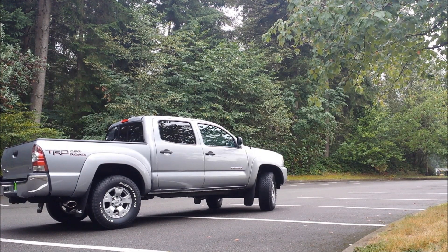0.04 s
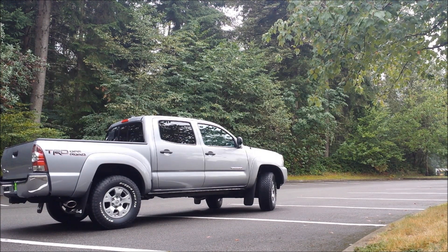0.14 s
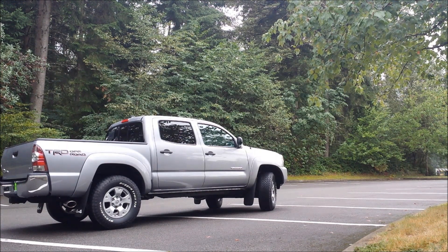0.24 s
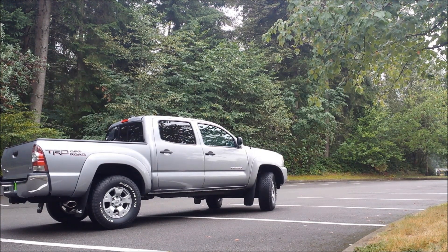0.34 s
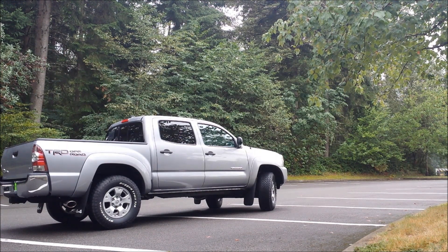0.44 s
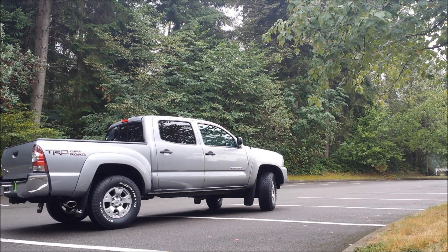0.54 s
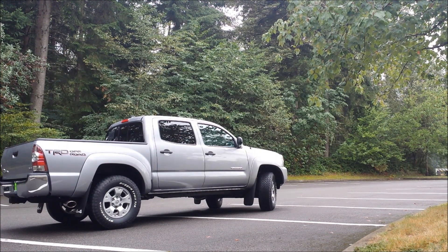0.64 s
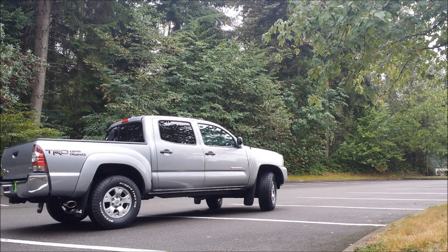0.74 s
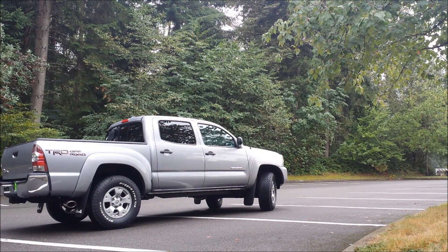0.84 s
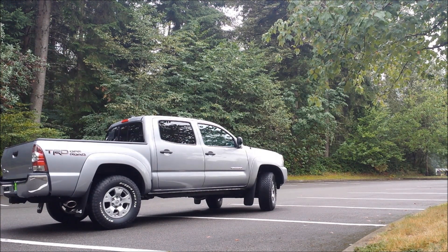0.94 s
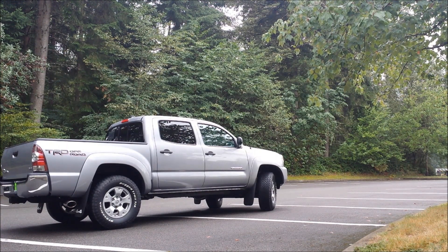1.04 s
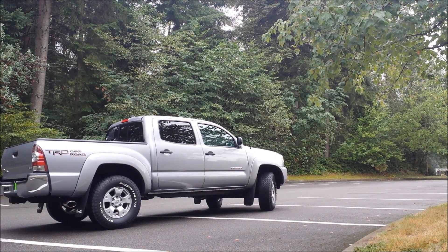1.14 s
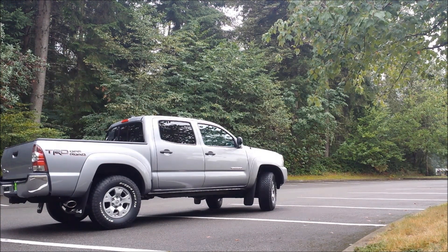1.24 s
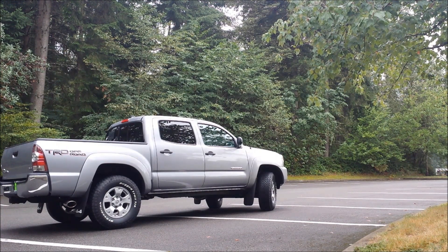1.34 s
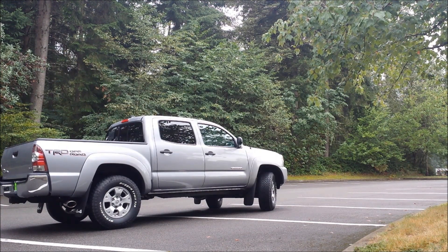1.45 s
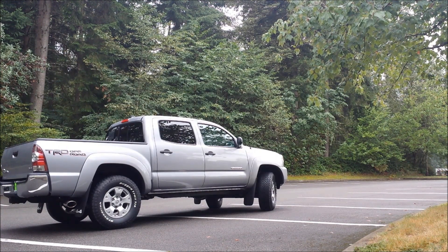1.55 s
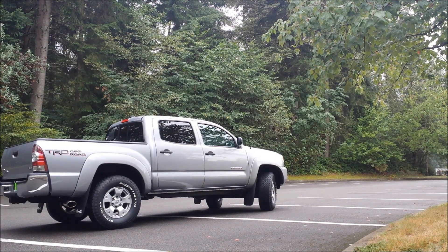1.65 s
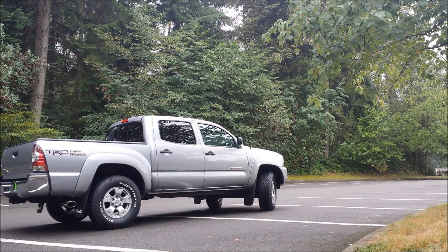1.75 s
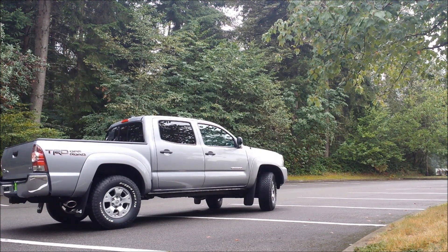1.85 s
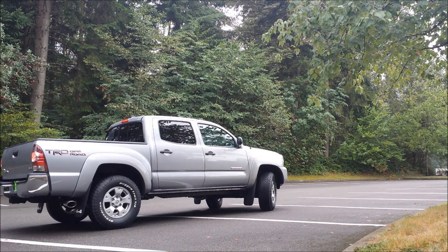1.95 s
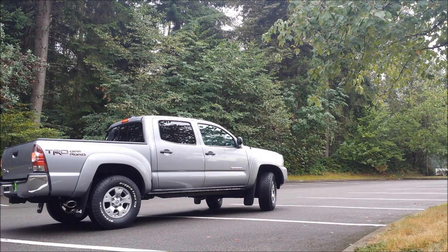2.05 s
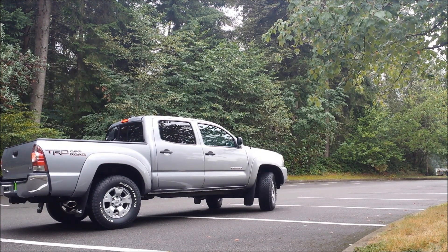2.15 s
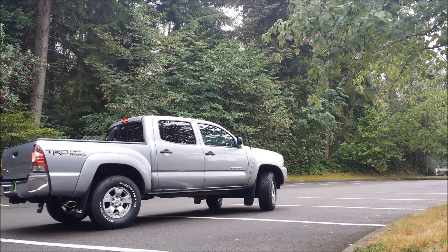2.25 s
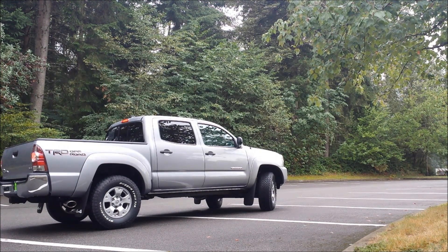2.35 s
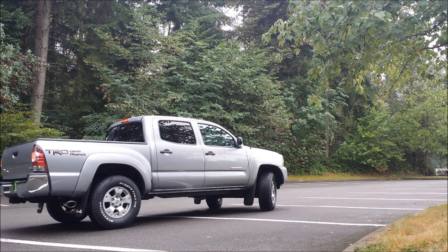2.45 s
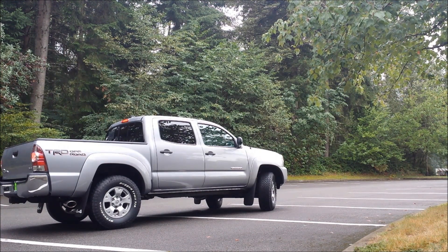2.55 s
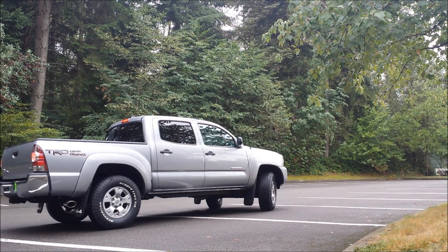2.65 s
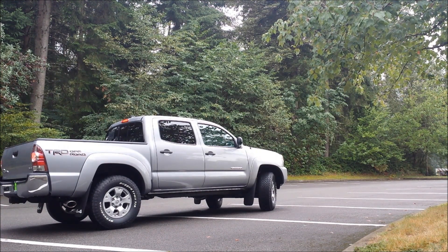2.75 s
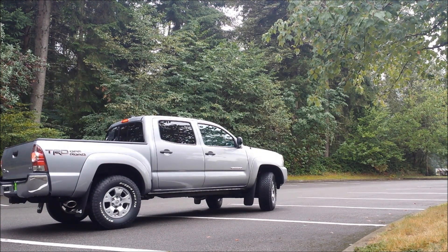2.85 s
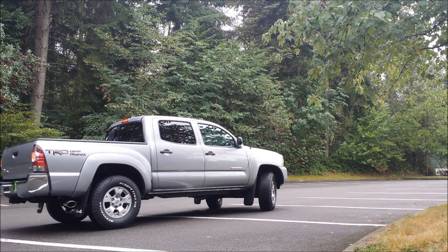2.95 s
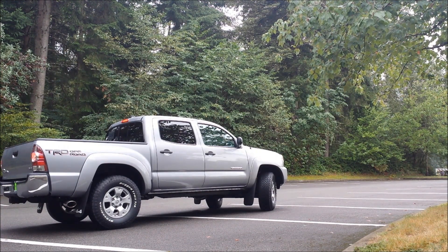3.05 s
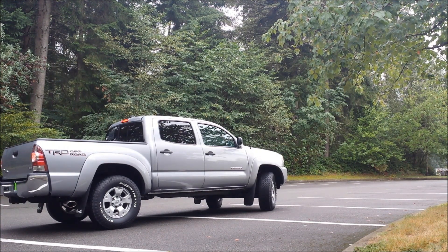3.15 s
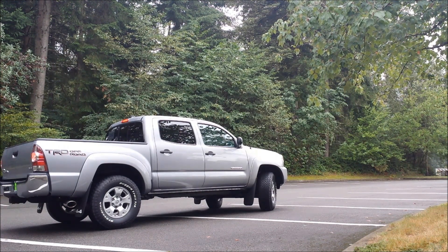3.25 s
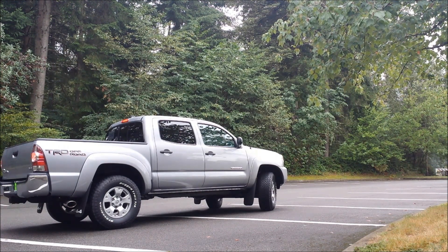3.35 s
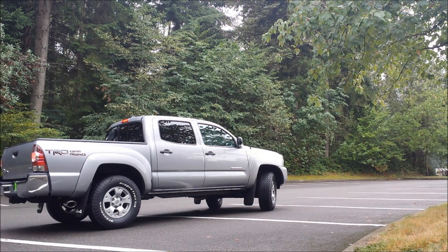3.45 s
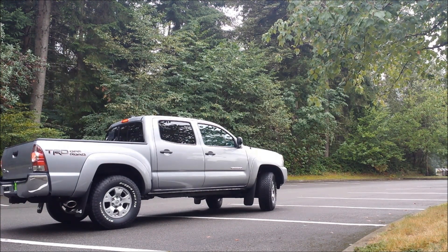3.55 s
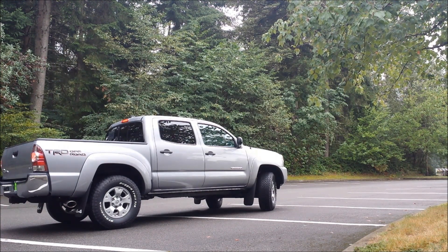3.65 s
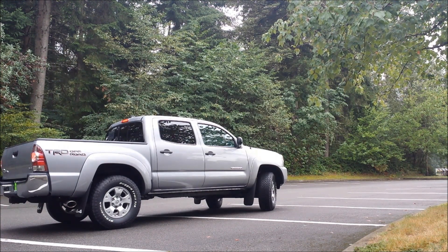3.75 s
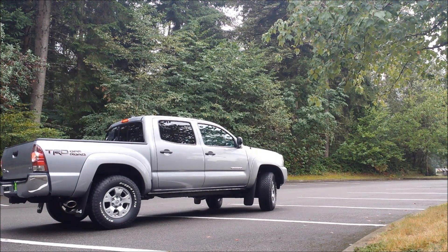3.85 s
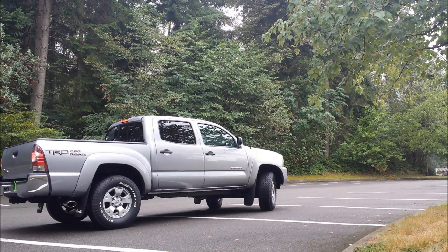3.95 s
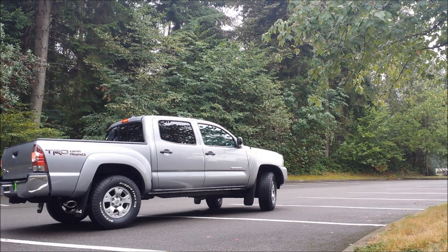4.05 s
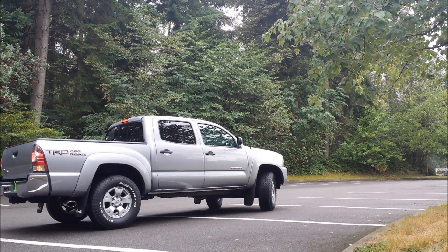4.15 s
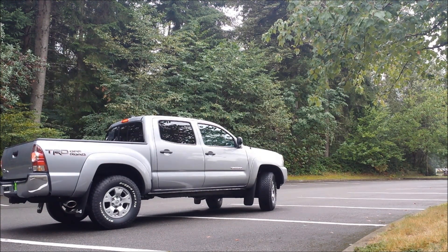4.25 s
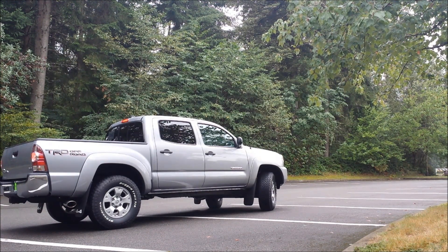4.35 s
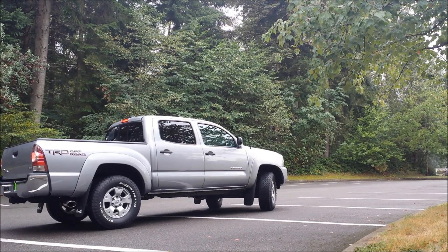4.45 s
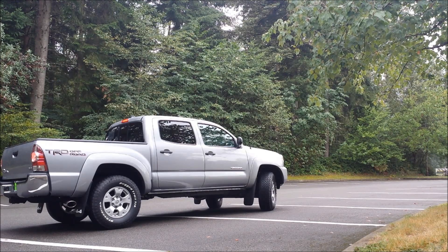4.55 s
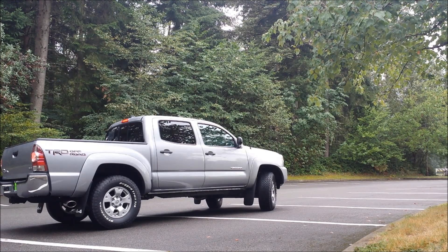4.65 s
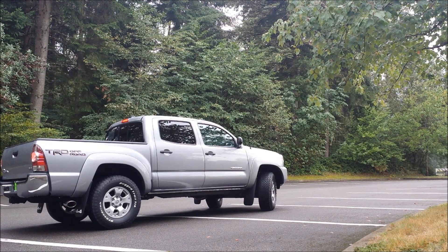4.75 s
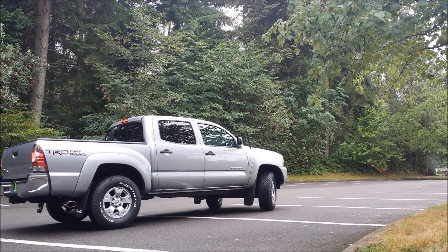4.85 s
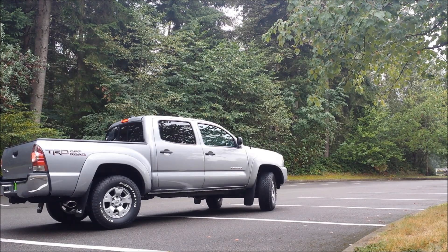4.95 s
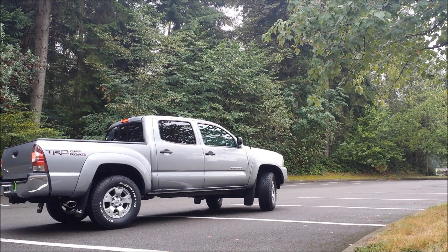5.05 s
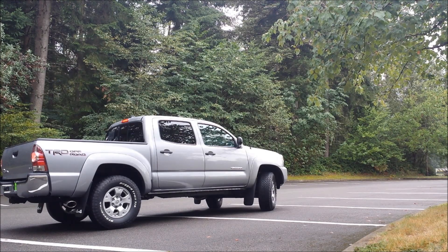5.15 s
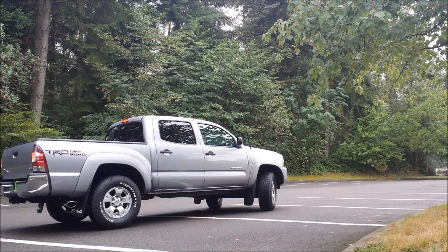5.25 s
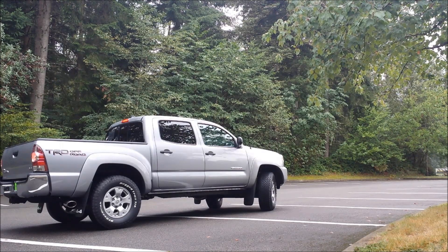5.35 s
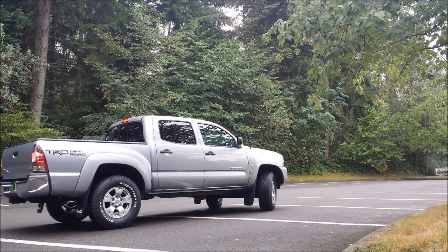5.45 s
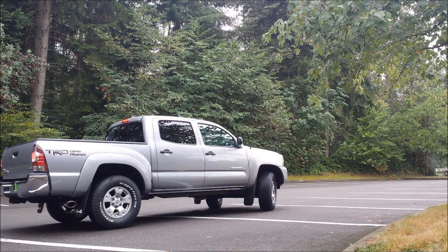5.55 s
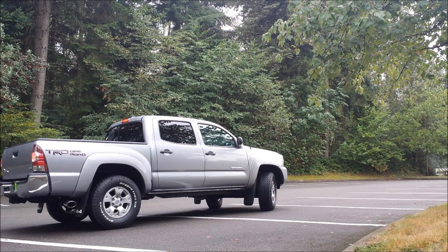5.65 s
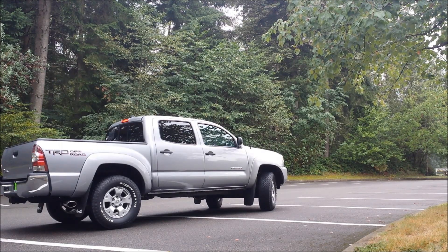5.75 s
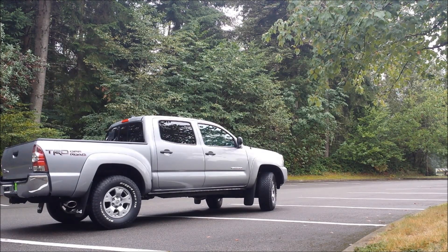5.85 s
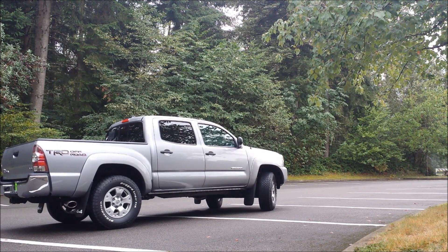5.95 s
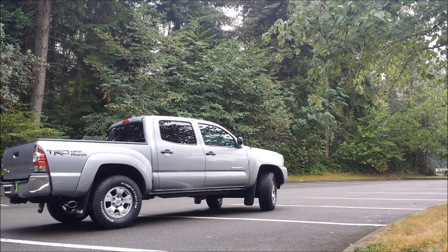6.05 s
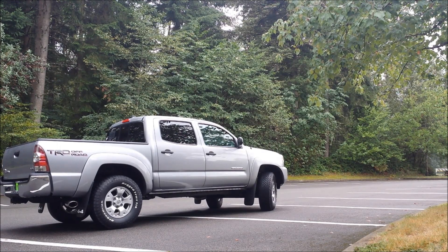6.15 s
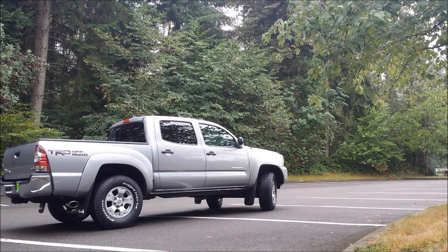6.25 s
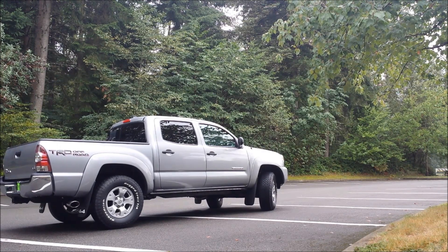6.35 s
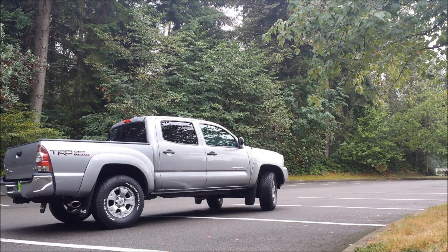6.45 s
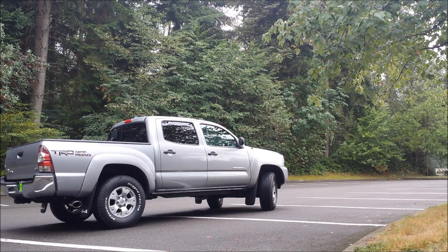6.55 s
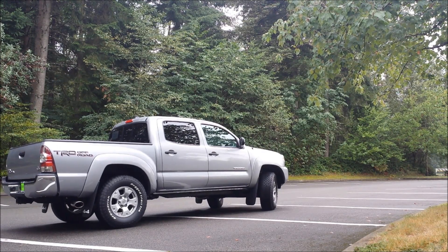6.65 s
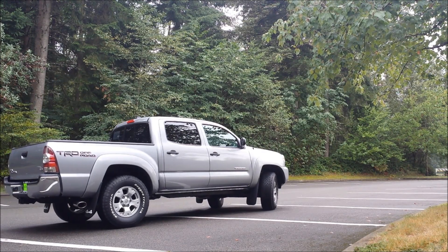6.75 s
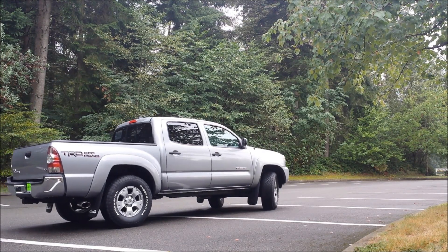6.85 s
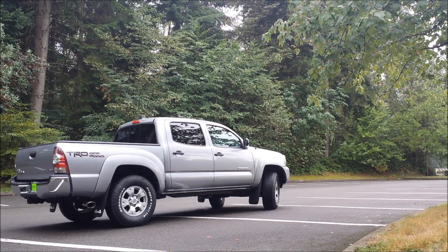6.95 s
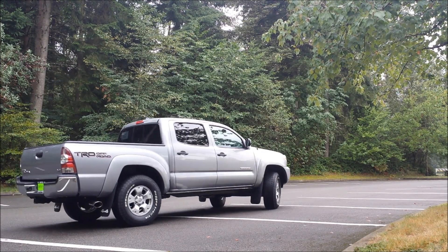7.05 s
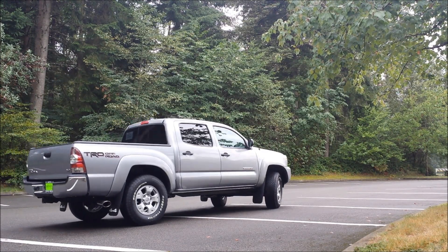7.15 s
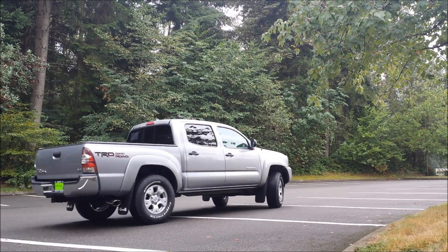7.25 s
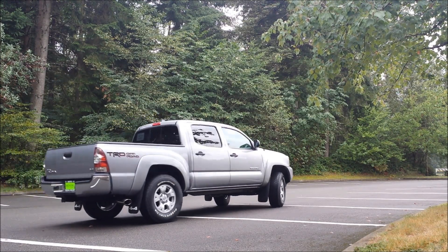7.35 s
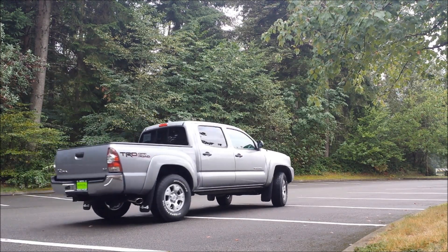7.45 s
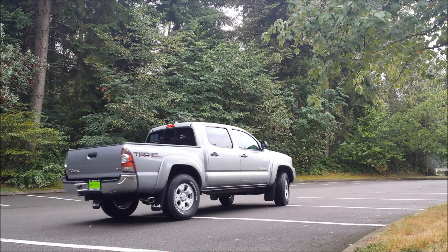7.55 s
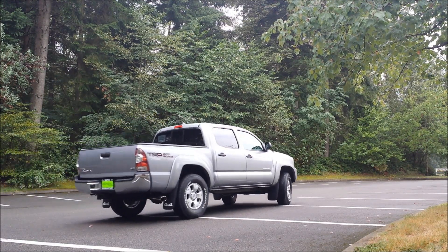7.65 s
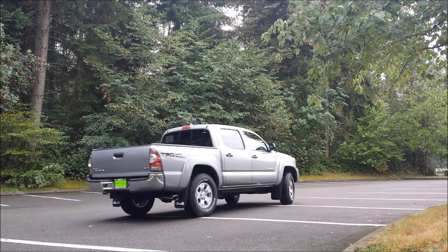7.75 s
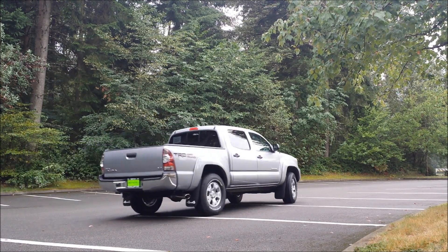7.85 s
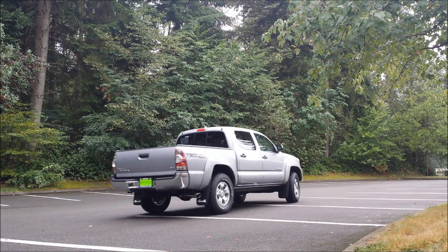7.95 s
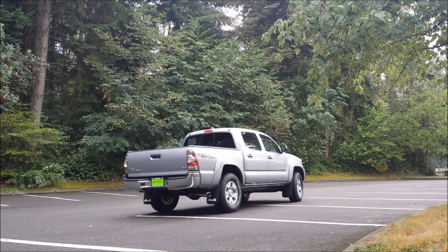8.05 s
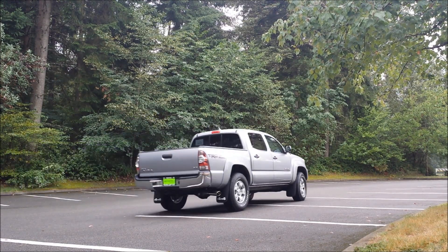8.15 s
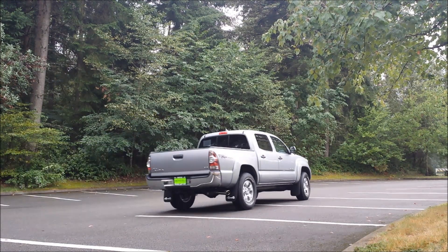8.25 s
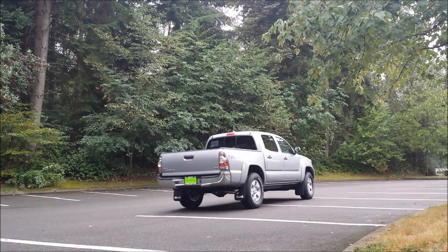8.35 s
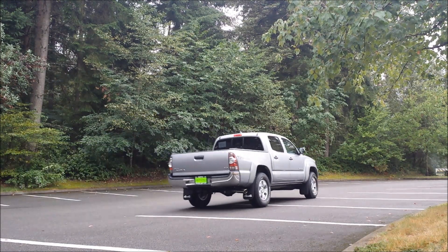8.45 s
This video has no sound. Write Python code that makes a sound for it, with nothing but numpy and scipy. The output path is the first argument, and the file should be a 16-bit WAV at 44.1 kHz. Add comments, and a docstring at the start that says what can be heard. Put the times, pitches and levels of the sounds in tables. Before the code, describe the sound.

Close behind a pickup's tailpipe in a tree-lined parking lot, the engine revs in a booming blip, then pops and burbles as the revs drop to a low idle with pump whine and engine-bay hiss. A few dull metallic clunks mark the shift into gear, a small bird twitters faintly, and the exhaust swells into a deep drone as the truck pulls away.

```python
"""A booming throttle blip opens the scene, with popping overrun: a six-cylinder pickup settles to idle,
drops into gear and pulls away across a lot. Two banks fire in turn into one exhaust, as filtered pulse
trains with gusts of turbulent noise. Sine tones make the pump whine, and shaped noise the engine-bay hiss
and roar and the clunks of gear lever and brakes. A small bird twitters in the trees as swept sines.
A pair of microphone ports stands behind the tailpipe."""
import sys
import numpy as np
from scipy import signal
from scipy.fft import rfft, irfft, next_fast_len
from scipy.io import wavfile
from scipy.ndimage import uniform_filter1d

SR = 44100
rng = np.random.default_rng(int(sys.argv[2]) if len(sys.argv) > 2 else 0)


def persist_wave(psi):
    """Save psi, clipped to +-1, as 16-bit WAV."""
    counts = np.round(np.clip(psi, -1, 1) * 32767).astype(np.int16)
    wavfile.write(sys.argv[1], SR, np.atleast_2d(counts).T)


N = 374409  # samples


def gain_of(db):
    """Logarithmic level law: 20 dB is a tenfold amplitude."""
    return 10 ** (np.asarray(db) / 20)


def evened(x):
    """Normalisation by the root mean square, to rms 1."""
    return x / np.sqrt(np.mean(abs(x) ** 2) + 1e-20)


def read(points, hz):
    """Linear interpolation of a spectrum along a logarithmic frequency axis."""
    f, value = np.transpose(points)
    return np.interp(np.log(hz + 1), np.log(f + 1), value)


def curves(rows):
    """Linear interpolation in time: every column of a table, one value a sample."""
    s, *columns = np.transpose(rows)
    return [np.interp(np.arange(N) / SR, s, column) for column in columns]


def ring(x, points, sharp, spread=0, size=16384):
    """Linear filtering: sharp 1 is minimum phase (struck, ringing out), 0 swells as slowly as it fades.
    Dispersion in the muffler chambers: every 100 Hz higher arrives spread seconds later."""
    signed_hz = np.fft.fftfreq(size, 1 / SR)
    hz = abs(signed_hz)
    # above the table the response falls 60 dB an octave
    db = read(points, hz) - 60 * np.log2(np.maximum(hz / points[-1][0], 1))
    log_gain = np.log(gain_of(np.maximum(db, -100)))
    struck_phase = signal.hilbert(log_gain).imag
    phase = sharp * struck_phase + np.pi * spread * signed_hz * hz / 100
    taps = np.fft.ifft(np.exp(log_gain - 1j * phase)).real
    return signal.oaconvolve(x, np.fft.fftshift(taps), "same")


def wander(rate_hz):
    """Low-passed random fluctuation of rms 1."""
    lowpass = signal.butter(2, rate_hz, fs=SR, output="sos")
    return evened(signal.sosfilt(lowpass, rng.standard_normal(N)))


# likeness of the noise at the two ports: f/Hz, left-right correlation [0 to 1]
LIKENESS = [(60, 0.64), (150, 0.97), (370, 0.95), (910, 0.78), (2260, 0.81), (5590, 0.13), (13800, 0.029)]


def noise(points, patchy_db, size=512):
    """Partial coherence: two-port noise of rms 1 from random short-time spectra with drifting patches."""
    frames, hz = 4 * N // size + 5, np.fft.rfftfreq(size, 1 / SR)
    a, b, c, d, patches = rng.standard_normal((frames, len(hz), 5)).T
    patches = uniform_filter1d(patches, size=8, axis=0)  # across frequency
    patches = evened(uniform_filter1d(patches, size=20, axis=1))  # across time
    same = np.clip(read(LIKENESS, hz), 0, 1)[:, None]
    left = a + 1j * b
    right = same * left + np.sqrt(1 - same ** 2) * (c + 1j * d)
    level_db = read(points, hz)[:, None] + patchy_db * patches
    spectra = np.array([left, right]) * gain_of(level_db)
    return evened(signal.istft(spectra, nperseg=size, noverlap=3 * size // 4)[1][:, :N])


# engine speed before the flywheel: t/s, firing rate of one bank f/Hz
SPEED = [(0, 48.4), (.15, 50.6), (.32, 45.5), (.62, 38.8), (.72, 41.7), (1.06, 69.6), (1.19, 65.6),
         (1.33, 63.1), (1.56, 54.2), (2.1, 37.7), (2.48, 29.5), (3, 24.2), (3.6, 21), (4.2, 19.4),
         (4.6, 19.2), (5, 20.1), (5.37, 14.5), (5.75, 15.3), (6.3, 15.2), (6.59, 16.2), (7.1, 32.2),
         (7.26, 35.1), (7.62, 32.9), (8, 32), (8.49, 36.15)]
FLYWHEEL_S = .07


def speed():
    """Rotational inertia: the flywheel rounds off every change in the firing rate of one bank (Hz)."""
    return uniform_filter1d(curves(SPEED)[0], size=round(FLYWHEEL_S * SR), mode="nearest")


# firing strength, following the throttle: t/s, level/dB before the exhaust colour
EFFORT = [(0, -13), (.12, -22), (.22, -18.5), (.34, -21.5), (.48, -17), (.57, -24), (.72, -14.5),
          (.82, -11), (.95, -9.5), (1.04, -13.5), (1.124, -20.5), (1.29, -12), (1.5, -14.5), (1.76, -19),
          (1.95, -14.5), (2.15, -19), (2.32, -19), (2.65, -24.5), (3.1, -26.5), (3.5, -26.5), (4.1, -30.5),
          (5, -30.5), (5.38, -38), (5.65, -31.5), (6.1, -33.5), (6.6, -22.5), (6.74, -13), (6.8, -11),
          (6.94, -10), (7.12, -6), (7.3, -5.5), (7.7, -8.5), (8.49, -6)]
# exhaust colour of the steady firings: f/Hz, level/dB
PIPE = [(26, -29), (46, -29), (66, -34.5), (86, -24), (106, -9), (119, -2), (131, -0.4), (143, -4.5),
        (161, -12.5), (186, -17), (216, -24.5), (241, -19.5), (306, -48), (451, -46.5)]
# strong-weak bank difference, the down-pipes being unequal: f/Hz, level/dB
BANKS = [(15, -68), (46, -61), (66, -56), (86, -21), (106, -11.5), (119, -10.5), (131, 4.5), (143, -6),
         (161, -8.5), (186, -23), (216, -13), (241, -9), (306, -22), (451, -38)]
# colour of turbulent gas and pops: f/Hz, level/dB
GAS_COLOUR = [(15, -31), (66, -23), (86, -17), (107, -11), (130, -5), (160, -7.5), (187, -12), (217, -8),
              (242, -7), (307, -12), (362, -18), (452, -20)]
# unburnt fuel pops on the overrun: t/s, relative level/dB before the gas colour
POPS = [(1.55, -10), (1.575, -1.5), (1.702, -29), (1.745, -1), (2.046, -46), (2.268, -8)]
MID_EFFORT_DB, MID_SPEED_HZ = -20, 35  # the bank and gas rules are counted from here
BANKS_DB, BANKS_SHARE, BANKS_DB_PER_OCTAVE = -28, 0.94, 3  # grows with effort and speed
GAS_DB, GAS_SHARE, OVERRUN_DB = -35, 0.63, 8.5  # slower growth; stronger while the revs fall
FALL_HZ_PER_S, RISE_HZ_PER_S = 33, 70  # full overrun, full blip
# one bank's throb dies below a low edge and during a blip
THROB_DB, THROB_LOW_HZ, THROB_DB_PER_OCTAVE, THROB_BLIP_DB = -51.5, 31, -61, -20
BANKS_BLIP_DB, THROB_OVERRUN_DB = 2.5, 9  # a blip widens the difference; overrun brings out the throb
RASP_DB, RASP_HZ = -4, 172  # a blip strengthens the orders above this edge
POP_LENGTH_S, POP_HZ = .014, 231  # burst that rings the tailpipe


def exhaust():
    """Periodic excitation: one pressure pulse a firing, banks alternating strong and weak.
    Turbulence: random gas pressure puffs out after each firing."""
    hz, firing_db = speed(), curves(EFFORT)[0]
    change = np.gradient(hz) * SR
    overrun = np.clip(-change / FALL_HZ_PER_S, 0, 1)
    blip = np.clip(change / RISE_HZ_PER_S, 0, 1)
    extra_effort_db = firing_db - MID_EFFORT_DB

    banks_db = BANKS_DB + BANKS_SHARE * extra_effort_db + BANKS_BLIP_DB * blip
    banks_db = banks_db + BANKS_DB_PER_OCTAVE * np.log2(hz / MID_SPEED_HZ)
    gas_db = GAS_DB + GAS_SHARE * extra_effort_db + OVERRUN_DB * overrun
    octaves_below = np.maximum(np.log2(THROB_LOW_HZ / hz), 0)
    throb_db = THROB_DB + THROB_DB_PER_OCTAVE * octaves_below
    throb_db = throb_db + THROB_BLIP_DB * blip + THROB_OVERRUN_DB * overrun

    firings = np.cumsum(2 * hz) / SR  # both banks
    count = np.floor(firings)
    pulses = np.diff(count, prepend=0) * SR / (2 * hz * np.sqrt(2))  # harmonics of rms 1
    puff_shape = evened(0.29 + np.exp(-(firings % 1) / 0.67))
    puffs = puff_shape * np.sqrt(SR / hz) / 2  # as strong as a random pulse a firing
    gas = gain_of(gas_db) * (0.33 * pulses + puffs) * rng.standard_normal(N)
    burn = np.hanning(round(POP_LENGTH_S * SR))
    ringing = 2 * np.sin(2 * np.pi * POP_HZ * np.arange(len(burn)) / SR)
    for s, db in POPS:
        gas[round(s * SR):][:len(burn)] += gain_of(db) * SR / 250 * ringing * burn / burn.sum()

    steady = ring(pulses * gain_of(firing_db), PIPE, .2, spread=.006)
    banks = ring(pulses * (-1) ** count * gain_of(banks_db), BANKS, .2, spread=.006)
    throb = gain_of(throb_db) * np.sqrt(2) * np.sin(np.pi * firings)  # at the rate of one bank
    highpass = signal.butter(3, RASP_HZ, "highpass", fs=SR, output="sos")
    rasp = gain_of(RASP_DB) * blip * signal.sosfiltfilt(highpass, steady + banks)
    return steady + banks + rasp + throb + ring(gas, GAS_COLOUR, 0.95)


# pump tones: multiple of the bank rate, level/dB before casing and load
WHINE = [(12, -42), (18, -54), (24, -50), (36, -55.5), (48, -56)]
# casing resonances: f/Hz, width/Hz, relative peak level/dB
CASING = [(592, 70, 0), (700, 70, 2), (930, 60, 1), (1060, 50, -4), (1560, 140, 1)]
# pump load, which sets the whine: t/s, level/dB
PUMP = [(0, -4), (1.05, -8), (1.3, -3.5), (1.8, 3), (5.1, 1.1), (5.4, -10), (6.5, -14.5), (8.49, -2)]


def whine():
    """Resonance: belt-driven pump tones ride the engine speed and swell as they cross casing modes."""
    hz, out = speed(), 0
    turns = np.cumsum(hz * (1 + .006 * wander(rate_hz=18))) / SR
    for order, db in WHINE:
        swell = 0
        for f, width, peak_db in CASING:
            swell = swell + gain_of(peak_db) / (1 + (2 * (order * hz - f) / width) ** 2)
        flutter_db = 2.5 * wander(rate_hz=9)
        tone = np.sqrt(2) * np.sin(2 * np.pi * order * turns)
        out += gain_of(db + flutter_db) * swell * tone
    return out * gain_of(curves(PUMP)[0])


# engine-bay hiss: t/s, level/dB before flicker and gearbox ringing
BAY = [(0, -43), (.5, -43), (.84, -40.5), (1, -42), (1.15, -36.5), (1.33, -39.5), (2.1, -40.5), (2.5, -42),
       (3.3, -43.5), (4.1, -46), (4.9, -44), (5.4, -47.5), (6.5, -48), (6.9, -40.5), (7.6, -39), (8, -41),
       (8.49, -40.5)]
# hiss colour: f/Hz, relative level/dB per Hz
HISS = [(760, -28.5), (1300, -2), (1370, -4), (1540, 2), (1870, -4), (1980, 2.5), (2120, -6.5), (2230, 2),
        (2400, -2), (2600, 0), (3540, -2.5), (5560, 0.5), (8560, -8), (12800, -21), (14300, -27.5)]
# roar colour: f/Hz, relative level/dB per Hz
ROAR = [(25, -31.5), (80, 0), (220, -18), (351, 0), (391, -6.5), (455, -5), (607, -8.5), (701, -6),
        (775, -15.5), (860, -10.5), (930, -6.5), (1060, -11), (1240, -17.5), (1800, -44)]
# gearbox ringing in the hiss: t/s, level/dB
GEAR = [(0, -5), (4.9, -16), (5.4, 2.5), (6.6, -2), (7.2, 0), (8.49, 1)]
# edges of the gearbox band: f/Hz
GEAR_HZ = [2400, 2607]
ROAR_DB, ROAR_SHARE, MID_HISS_DB = -39.5, 0.67, -42.5  # the roar follows the hiss by a share


def bay():
    """Broadband noise radiation: flickering fan, intake and valve-gear hiss over a duller roar.
    Band-pass resonance: a gearbox band rings within the hiss."""
    hiss_db = curves(BAY)[0]
    roar_db = ROAR_DB + ROAR_SHARE * (hiss_db - MID_HISS_DB)
    flicker_db = 0.39 * wander(rate_hz=38)
    hiss = gain_of(hiss_db + flicker_db) * noise(HISS, patchy_db=1.08)
    bandpass = signal.butter(1, GEAR_HZ, "bandpass", fs=SR, output="sos")
    gear = gain_of(curves(GEAR)[0]) * signal.sosfilt(bandpass, hiss)
    roar = gain_of(roar_db) * noise(ROAR, patchy_db=2.5, size=2048)
    return hiss + gear + roar


# linkage clunks: t/s, relative rattle level/dB, relative thud level/dB, decay scale/s
CLUNKS = [(4.248, -27.5, -20.5, 0.054), (4.325, -35.5, -26.5, 0.078), (4.569, -33.5, -25.5, 0.045),
          (4.876, -37, -32, 0.076), (4.96, -37, -38, 0.024), (5.363, -38, -38, 0.023),
          (5.704, -39.5, -50, 0.035), (5.881, -45, -29, 0.034)]
# rattle colour: f/Hz, relative level/dB per Hz
RATTLE = [(900, -35), (1400, -2), (3060, -8), (4330, -1.5), (6580, -4), (12500, -22.5), (14000, -31)]
# thud colour: f/Hz, relative level/dB per Hz
THUD = [(120, -14), (190, 7), (300, -6.5), (468, -13.5), (614, -5), (820, -20), (965, -9), (1300, -28),
        (1800, -57)]


def clunks():
    """Impact excitation: each clunk is a short rattle of loose metal with a dull thud under it."""
    rattle, thud, t = np.zeros(N), np.zeros(N), np.arange(N) / SR
    for s, rattle_db, thud_db, length in CLUNKS:
        u = np.maximum(t - s, 0) / max(length, .005)
        shape = (1 - np.exp(-u / 0.15)) * np.exp(-(u / 0.91) ** 2)
        rattle += gain_of(rattle_db) * shape
        thud += gain_of(thud_db) * shape
    grit = gain_of(1.0 * wander(rate_hz=250))
    metal = gain_of(-4.0) * rattle * grit * noise(RATTLE, patchy_db=1.8)
    return metal + gain_of(-3.5) * thud * noise(THUD, patchy_db=0.94)


# bird notes: t/s, level/dB before echoes and panning, centre f/Hz, length/s
BIRD = [(5.84, -47, 8100, 0.023), (6.005, -48.5, 7940, 0.028), (6.091, -48, 7800, 0.02),
        (6.169, -46, 8300, 0.046), (6.454, -49, 7860, .031), (6.542, -53, 7710, .021)]


def bird():
    """Frequency modulation: thin raspy notes whose pitch swings up and down very fast."""
    out = np.zeros(N)
    for s, db, hz, length in BIRD:
        t = np.arange(0, length, 1 / SR)
        rasp = evened(uniform_filter1d(rng.standard_normal(len(t)), size=40))
        swing = np.cos(2 * np.pi * (86 * t + rng.random()))  # 86 swings a second
        pitch = hz + 600 * swing + 450 * rasp
        note = np.sin(2 * np.pi * np.cumsum(pitch) / SR) * signal.windows.tukey(len(t), .45)
        out[round(s * SR):][:len(t)] += gain_of(db) * note
    return out + 0.49 * np.roll(out, 520) + 0.3 * np.roll(out, 1320)  # echoes off the trunks


def scene():
    """Superposition: the truck stands straight ahead, the bird a little to the right."""
    return exhaust() + whine() + bay() + clunks() + bird() * gain_of([[-1.4], [1.4]])


# phase between the ports: f/Hz, lead of the left/rad
LEAD = [(20, -0.04), (340, 0.25), (861, 0.07), (1551, 0.95), (2931, 0.24), (3701, 1.6), (4571, -0.2),
        (6631, 0.6), (8270, -0.4), (10200, 7), (11801, 5)]
# level between the ports: f/Hz, left minus right level/dB
TILT = [(61, 0.8), (500, -0.1), (741, 1), (1121, 7), (1711, 1), (2591, 2), (3941, 3.5), (5991, 7.5),
        (7500, -4), (9101, -9.5), (13801, -19.5)]
CEILING = 1.66  # the microphone squeezes its highest peaks toward this amplitude
EDGE_HZ = 14250  # upper band limit


def record(dry):
    """Interaural-style level and phase differences between ports, then saturation and a band limit."""
    size = next_fast_len(N)
    hz = np.fft.rfftfreq(size, 1 / SR)
    port = gain_of(read(TILT, hz) / 2) * np.exp(.5j * read(LEAD, hz))  # half the difference each
    ported = irfft(rfft(dry, size) * [port, 1 / port], size)[:, :N]
    squeezed = CEILING * np.tanh(ported / CEILING)
    lowpass = signal.firwin(1023, EDGE_HZ, window=("kaiser", 9), fs=SR)
    return signal.oaconvolve(squeezed, lowpass[None], "same")


dry = scene()
out = record(dry)
persist_wave(out)
```